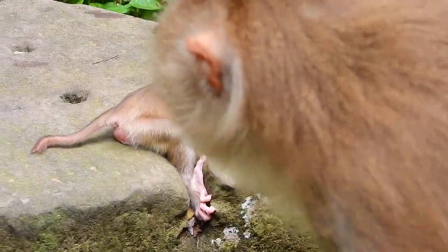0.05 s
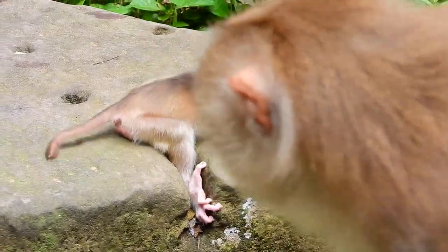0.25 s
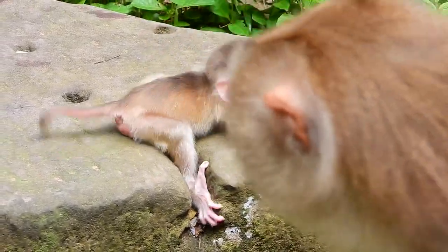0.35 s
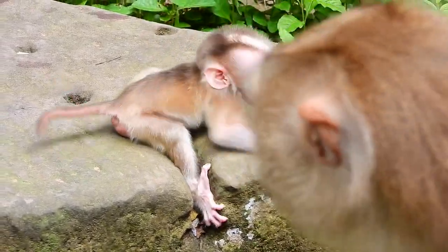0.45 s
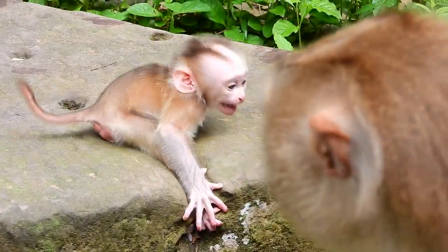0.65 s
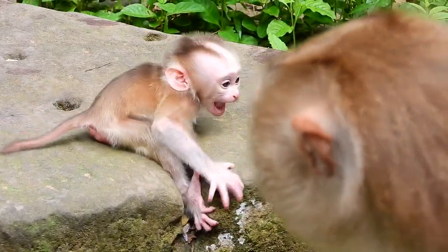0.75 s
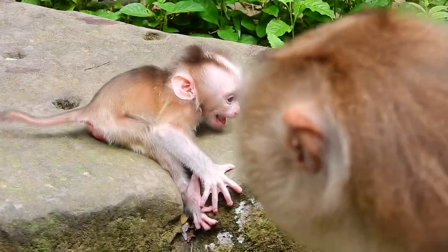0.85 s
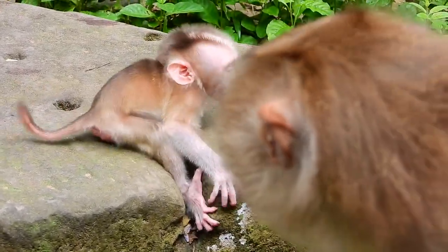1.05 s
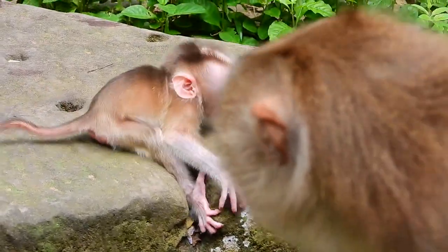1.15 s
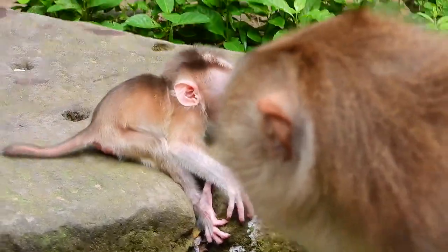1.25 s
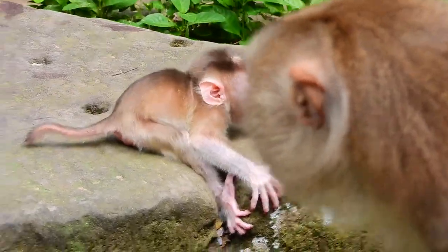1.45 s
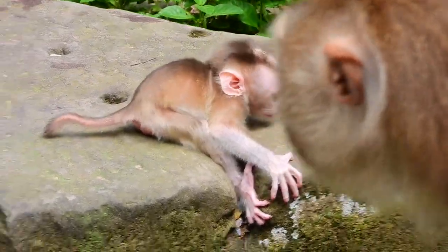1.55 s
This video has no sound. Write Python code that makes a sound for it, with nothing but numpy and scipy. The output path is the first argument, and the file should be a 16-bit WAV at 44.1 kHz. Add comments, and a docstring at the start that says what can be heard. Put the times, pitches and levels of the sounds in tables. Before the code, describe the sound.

Outdoors and near the microphone, an infant monkey squeals four times, first very briefly, then longer and rougher, each sliding downward. Soft scuffs, two small dry clicks and a light echo surround the cries over quiet background hiss.

```python
"""Baby monkey cries on stone

Four short shrill cries outdoors, near the microphone: jittering harmonics and pulsed noise through
four resonances, the mouth first and the upper ones after, with a changing rasp and thin whistles.
Scuffs and low thuds in noise, two faint sine chirps and two damped clicks lie around them, over
filtered-noise hush. Noise-built reflections and a light echo follow all but the clicks and hush."""
import sys
import numpy as np
from scipy import signal
from scipy.fft import rfft, irfft, next_fast_len
from scipy.io import wavfile
from scipy.ndimage import uniform_filter1d, map_coordinates

SR = 44100
rng = np.random.default_rng(int(sys.argv[2]) if len(sys.argv) > 2 else 0)


def digitize_waveform(pressure):
    """Quantize a signal to 16-bit integers and store it at the path in sys.argv[1].

    Rows of a 2-D input are taken as channels; values are limited to [-1, 1].
    """
    field = np.atleast_2d(pressure).T
    bounded = np.clip(field, -1, 1)
    quanta = np.round(bounded * 32767).astype(np.int16)
    wavfile.write(sys.argv[1], SR, quanta)


N = 70560
T = np.arange(N) / SR  # s

# Voice path, one list a cry: t/s, pitch/Hz, roughness/0-1, mouth resonance f/Hz, throat resonance f/Hz
CRY_VOICE = [
    [(.2165, 1211, 0.13, 2470, 1436), (.226, 956, 0.48, 2590, 1470), (.24, 949, 0.74, 2470, 1380),
     (.252, 683.4, 0.83, 2250, 1350), (.264, 606, 0.06, 2200, 1200), (.288, 623, 0.66, 2200, 1260),
     (.32, 529, 0.1, 2030, 1060)],
    [(.4615, 900, 0.6, 2650, 1360), (.476, 944, 0.71, 2820, 1330), (.495, 798, 0.77, 3010, 1220),
     (.515, 691.6, 0.83, 2690, 710), (.545, 806, 0.97, 2750, 1510), (.565, 863, 0.9, 2900, 1450),
     (.59, 729.4, 0.81, 2690, 935), (.635, 507, 0, 2630, 576)],
    [(.765, 900, 0.65, 1900, 1530), (.79, 853.6, 0.5, 2800, 1270), (.81, 677, 0.71, 3000, 1157),
     (.83, 740, 0.62, 3000, 1410), (.85, 802.3, 0.13, 2850, 1600), (.868, 776.7, 0.37, 2770, 1500),
     (.884, 588.3, 0.06, 2620, 1120), (.905, 569, 0.38, 2520, 1070), (.94, 501, 0.9, 2700, 960)],
    [(1.096, 1098, 0.54, 2250, 1100), (1.104, 914.8, 0.25, 2320, 930), (1.122, 925.7, 0.1, 2280, 900),
     (1.134, 814, 0.07, 2220, 1340), (1.145, 822, 0.11, 2320, 1430), (1.163, 948, 0.09, 2330, 1020),
     (1.18, 769.7, 0.9, 2760, 1510), (1.203, 675, 0.69, 2930, 1280), (1.228, 661.6, 0.72, 2930, 1330),
     (1.255, 604, 1, 2930, 1200)],
]
# Resonance levels before trim, one list a cry: t/s, mouth/dB, middle/dB, top/dB, throat/dB
CRY_LEVELS = [
    [(0.22, -41, -53, -52, -50), (0.23, -32, -55, -35.5, -55), (0.236, -35.5, -37.5, -37.5, -51.5),
     (0.256, -49, -38, -39, -41.5), (0.278, -73, -52, -51.5, -49), (0.31, -82, -61, -56.5, -59)],
    [(0.463, -35.5, -64, -44, -54), (0.475, -34, -52, -45, -65), (0.483, -39.5, -44.5, -28.5, -52.5),
     (0.507, -41.5, -35, -41, -49), (0.541, -42.5, -38.5, -48.5, -47.5), (0.563, -55.5, -30, -39, -53.5),
     (0.603, -50.5, -44.5, -53.5, -55), (0.63, -72, -52, -64, -81)],
    [(0.769, -47.5, -76, -60.5, -57), (0.783, -44.5, -53.5, -47.5, -60), (0.799, -41, -42, -38, -55),
     (0.811, -42, -42, -45.5, -45.5), (0.841, -48, -38.5, -43.5, -48.5), (0.853, -47, -39, -41, -63),
     (0.863, -45.5, -37, -37.5, -45.5), (0.871, -54.5, -39, -40, -54), (0.897, -46.5, -36.5, -45.5, -48.5),
     (0.911, -58.5, -40.5, -55, -58), (0.935, -72, -51, -61, -67.5)],
    [(1.1, -39, -61, -56, -64), (1.114, -35.5, -49.5, -40.5, -59), (1.126, -39, -43, -38.5, -52.5),
     (1.138, -34, -63, -34.5, -47), (1.154, -41, -43.5, -40.5, -53), (1.166, -43.5, -42, -32, -56.5),
     (1.184, -45, -37.5, -42.5, -48), (1.218, -43, -46, -47.5, -49.5), (1.226, -40, -42.5, -46, -51.5),
     (1.242, -52, -48.5, -60, -76), (1.25, -59, -48, -58.5, -77)],
]
# Gliding mouth resonance: f over centre/ratio, gain/dB
MOUTH_SHAPE = [(.4, -45), (.66, -14), (.78, -1), (1, 4), (1.21, 0), (1.36, -15.5), (1.6, -36), (2.5, -83)]
# Gliding throat resonance: f over centre/ratio, gain/dB
THROAT_SHAPE = [(.14, -76), (.3, -22), (.42, -3.5), (.55, -17), (.75, -14), (1, 2), (1.17, -5.5),
                (1.38, -2.5), (2.2, -72)]
# Fixed middle resonance: f/Hz, gain/dB
MIDDLE_SHAPE = [(2200, -64), (3400, -7), (3900, -1), (4800, 2.5), (5600, 2), (6300, -7), (7200, -4.5),
                (10000, -65)]
# Fixed top resonances: f/Hz, gain/dB
TOP_SHAPE = [(4500, -50), (6300, -10), (7200, 0), (7900, -3), (8600, -1.5), (9600, -10), (11000, -26),
             (13000, -35), (15500, -38)]
# Thin whistles of the folds, one list a whistle: t/s, pitch/Hz, level/dB
WHISTLE_PATHS = [
    [(.2165, 2550, -3), (.221, 2340, -28.5), (.232, 2370, -44)],
    [(.462, 2750, -35), (.474, 2895, -39.5), (.486, 2800, -56)],
    [(.228, 7800, -36), (.237, 7410, -36.5), (.25, 7400, -43), (.264, 7050, -42)],
    [(.478, 7600, -61), (.492, 7250, -52), (.512, 7500, -32), (.535, 7000, -54)],
    [(.802, 3490, -54), (.812, 3426, -38.5), (.829, 3680, -39), (.855, 3920, -46)],
    [(.866, 5800, -39), (.878, 5370, -57), (.898, 5180, -53), (.922, 5340, -61)],
    [(1.108, 5550, -46), (1.122, 5540, -43.5), (1.137, 5350, -58), (1.166, 5650, -42)],
    [(1.166, 2834, -45), (1.188, 3300, -42), (1.204, 3440, -44), (1.225, 3316, -46.5), (1.24, 2930, -51)],
]
# Scuffs and low thuds in noise, one of them under the end of the third cry:
# t/s, level/dB, centre f/Hz, t60/s
SCUFF_EVENTS = [(0.058, -56.5, 533, 0.28), (0.186, -56, 447, 0.16), (0.318, -49.5, 3200, 0.082),
                (0.365, -51.5, 724, 0.068), (0.379, -50, 3240, 0.3), (0.922, -65, 243, 0.13),
                (1.424, -51.5, 1130, 0.12), (1.431, -58.5, 426, 0.14), (1.48, -54, 4400, 0.37),
                (1.542, -52, 1200, 0.031)]
# Chirps: t/s, length/s, level/dB, start f/Hz, end f/Hz
CHIRP_EVENTS = [(0.029, 0.0085, -44.5, 2335, 1910), (0.662, 0.052, -63, 383, 365)]
# Dry clicks: t/s, ring level/dB, ring f/Hz, snap over ring/dB
CLICK_EVENTS = [(0.3966, -31.5, 3350, -11), (0.4062, -29.5, 4580, -5)]
# Echo decay: f/Hz, t60/s
ECHO_T60 = [(300, 0.3), (1500, 0.95), (4500, 0.43), (8000, 0.53), (14000, 0.64)]
# Echo colour: f/Hz, gain/dB
ECHO_COLOUR = [(200, -6), (1200, -31), (2500, -4), (4500, 9), (8000, -2.5), (14000, -7)]
# Hush spectrum: f/Hz, relative level/dB
HUSH_SPECTRUM = [(25, -3), (60, -18.5), (110, -3.5), (190, -0.5), (300, -1), (450, 3), (730, 2.5),
                 (1200, 1.5), (3300, -2.5), (4000, -6.5), (4850, 2), (5700, -6), (7200, -4.5), (11700, -18),
                 (13800, -28), (15800, -57)]
# Hush level before panning: t/s, level/dB
HUSH_LEVEL = [(0, -61.5), (.1, -59), (.16, -61.5), (.35, -57), (.7, -67.5), (1.05, -68), (1.35, -65),
              (1.6, -61.5)]

# resonance trims; pan is left minus right; noise width is side over mid before filtering
MOUTH_DB, MIDDLE_DB, TOP_DB, THROAT_DB = 0, -2, -6, -0.5
MOUTH_PAN_DB, MIDDLE_PAN_DB, TOP_PAN_DB, THROAT_PAN_DB = 2.2, -5, -8.5, -3.6
MOUTH_WIDTH, MIDDLE_WIDTH, TOP_WIDTH, THROAT_WIDTH = 0.14, 0.16, 0.95, 0.14
MIDDLE_HISS, TOP_HISS = .3, .15  # noise power share left when the voice is smooth
JITTER, JITTER_ROUGH, JITTER_KNOTS_PER_S = .005, .025, 500  # pitch scatter/ratio; added at full roughness
UNEVEN_DB_AT_H10, UNEVEN_KNOTS_PER_S = 5, 30  # swell of each harmonic, given for the tenth
SHIMMER_DB, SHIMMER_KNOTS_PER_S, PUFF_DEPTH = 0.96, 330, 0.55
CRY_EDGE_S = .0025
VOICE_LOW_CUT_HZ = 352  # high-pass: cries and whistles are thin below this
WHISTLE_JITTER, WHISTLE_KNOTS_PER_S, WHISTLE_EDGE_S, WHISTLE_PAN_DB = 0.01236, 240, 0.0061, -1.5
SCUFF_RISE_SHARE, SCUFF_WIDTH_OCT = 0.05, 0.96  # rise time over t60; half width
CLICK_T60_S, SNAP_T60_S, SNAP_LOW_HZ, SNAP_HIGH_HZ = 0.0099, 0.0066, 3520, 8200
NEAR_DB, NEAR_SIDE_DB, NEAR_T60_S = -6, -8, .04
ECHO_DB = -13.5  # before ECHO_COLOUR
HUSH_SIDE_DB, HUSH_PAN_DB = -6, -2  # side over mid; left minus right
CUT_HZ = 15850


def larynx(pitch_hz, rough, count=20):
    """Uneven harmonics of the jittering folds, and two noises that puff once a cycle."""
    scatter = (JITTER + JITTER_ROUGH * rough) * wobble(JITTER_KNOTS_PER_S)
    hz = pitch_hz * (1 + scatter)
    phase = 2 * np.pi * np.cumsum(hz) / SR
    tone = 0
    for k in range(1, count + 1):
        swell = amp(UNEVEN_DB_AT_H10 * np.sqrt(2 * k / count) * wobble(UNEVEN_KNOTS_PER_S))
        harmonic = np.cos(k * phase + 2 * np.pi * rng.random())
        tone = tone + swell * harmonic * (k * hz < CUT_HZ)
    rasp = rng.standard_normal((2, N)) * (1 + PUFF_DEPTH * np.cos(phase))
    # scale the tone to the power density of the noise
    return tone * 2 * np.sqrt(pitch_hz / SR), unit(rasp)


def cries():
    """Voice through four resonances; mouth and throat glide as the mouth moves."""
    out = np.zeros((2, N))
    for voice, levels in zip(CRY_VOICE, CRY_LEVELS):
        pitch_hz, rough, mouth_hz, throat_hz = curves(voice)
        tone, (rasp, scatter) = larynx(pitch_hz, rough)
        gate = edges(voice, CRY_EDGE_S) * amp(SHIMMER_DB * wobble(SHIMMER_KNOTS_PER_S))
        tract = [
            (lambda x: gliding(x, MOUTH_SHAPE, mouth_hz), MOUTH_DB, MOUTH_PAN_DB, MOUTH_WIDTH, 0),
            (lambda x: shaped(x, MIDDLE_SHAPE), MIDDLE_DB, MIDDLE_PAN_DB, MIDDLE_WIDTH, MIDDLE_HISS),
            (lambda x: shaped(x, TOP_SHAPE), TOP_DB, TOP_PAN_DB, TOP_WIDTH, TOP_HISS),
            (lambda x: gliding(x, THROAT_SHAPE, throat_hz), THROAT_DB, THROAT_PAN_DB, THROAT_WIDTH, 0)]
        for (resonance, trim_db, pan_db, width, hiss), level_db in zip(tract, curves(levels)):
            noise_share = np.clip(rough + hiss * (1 - rough), 0, 1)
            noise = np.array([rasp + width * scatter, rasp - width * scatter])
            source = np.sqrt(1 - noise_share) * tone + np.sqrt(noise_share) * noise
            band = steady(resonance(source)) * gate * amp(level_db + trim_db)
            out += pan(band, pan_db)
    return out


def whistles():
    """Narrow wavering sines of the folds that ride on the cries."""
    out = np.zeros(N)
    for rows in WHISTLE_PATHS:
        pitch_hz, level_db = curves(rows)
        hz = pitch_hz * (1 + WHISTLE_JITTER * wobble(WHISTLE_KNOTS_PER_S))
        level = amp(level_db + SHIMMER_DB * wobble(SHIMMER_KNOTS_PER_S))
        out += edges(rows, WHISTLE_EDGE_S) * level * sine(hz)
    return pan(out, WHISTLE_PAN_DB)


def scuffs():
    """Scuffs and low thuds: soft, broad bursts of noise with exponential decay."""
    out = np.zeros(N)
    for start_s, level_db, centre_hz, t60_s in SCUFF_EVENTS:
        def band(hz):
            octaves = np.log2((hz + 1) / centre_hz)
            return 1 / (1 + (octaves / SCUFF_WIDTH_OCT) ** 6)
        t = np.maximum(T - start_s, 0)
        burst = unit(filtered(rng.standard_normal(N), band))
        rise = np.minimum(t / (SCUFF_RISE_SHARE * t60_s), 1)
        out += burst * rise * amp(level_db - 60 * t / t60_s)
    return out


def chirps():
    """Short falling sines under a half-sine envelope."""
    out = np.zeros(N)
    for start_s, length_s, level_db, start_hz, end_hz in CHIRP_EVENTS:
        u = np.clip((T - start_s) / length_s, 0, 1)
        out += amp(level_db) * np.sin(np.pi * u) * sine(start_hz + (end_hz - start_hz) * u)
    return out


def clicks():
    """Each click is a bright noise snap and one quickly damped ring."""
    def bright(hz):
        high_pass = hz ** 3 / (hz ** 3 + SNAP_LOW_HZ ** 3)
        return high_pass / (1 + (hz / SNAP_HIGH_HZ) ** 4)
    out = np.zeros(N)
    for start_s, ring_db, ring_hz, snap_db in CLICK_EVENTS:
        t = np.maximum(T - start_s, 0)
        snap = unit(filtered(rng.standard_normal(N), bright)) * amp(snap_db - 60 * t / SNAP_T60_S)
        ring = np.sin(2 * np.pi * ring_hz * t) * amp(-60 * t / CLICK_T60_S)
        onset = np.minimum(t * ring_hz, 1)  # one ring cycle
        out += onset * amp(ring_db) * (ring + snap)
    return out


def surroundings(x):
    """Quick reflections off the stone widen the sound; a faint longer echo follows, both decaying noise."""
    hz, t, z = signal.stft(rng.standard_normal((2, SR // 2)), SR, nperseg=256)
    decay = amp(-60 * t / along(ECHO_T60, hz)[:, None])
    tail = signal.istft(z * decay, SR, nperseg=256)[1]
    near = rng.standard_normal(tail.shape) * amp(-60 * T[:tail.shape[1]] / NEAR_T60_S)

    def through(response):
        unit_energy = response / np.linalg.norm(response, axis=1, keepdims=True)
        return signal.fftconvolve(x.mean(0)[None], unit_energy, axes=1)[:, :N]

    mid, side = through(near) * amp([[NEAR_DB], [NEAR_SIDE_DB]])
    echo = amp(ECHO_DB) * shaped(through(tail), ECHO_COLOUR)
    return np.array([mid + side, mid - side]) + echo


def hush():
    """Outdoor background: shaped noise of slowly varying level, mostly alike in both channels."""
    mid, side = unit(shaped(rng.standard_normal((2, N)), HUSH_SPECTRUM))
    side = side * amp(HUSH_SIDE_DB)
    return pan(np.array([mid + side, mid - side]), HUSH_PAN_DB) * amp(curves(HUSH_LEVEL)[0])


def gliding(x, shape, centre_hz, size=256):
    """x through a resonance whose centre moves, frame by frame."""
    overlap = size - size // 4
    hz, t, z = signal.stft(x, SR, nperseg=size, noverlap=overlap)
    ratio, db = np.transpose(shape)
    log_ratio = np.log((hz[:, None] + 1) / np.interp(t, T, centre_hz))
    gain = amp(np.interp(log_ratio, np.log(ratio), db))
    return signal.istft(z * gain, SR, nperseg=size, noverlap=overlap)[1][..., :N]


def filtered(x, response):
    """x times a response of frequency, in the spectrum."""
    m = next_fast_len(N + 8192)
    return irfft(rfft(x, m) * response(np.fft.rfftfreq(m, 1 / SR)), m)[..., :N]


def shaped(x, points):
    """x through a fixed (Hz, dB) curve."""
    return filtered(x, lambda hz: amp(along(points, hz)))


def steady(x, size=300):
    """Hold the short-term rms of a pair's mean near 1; size in samples."""
    return x / np.sqrt(np.abs(uniform_filter1d(x.mean(0) ** 2, size)) + 1e-12)


def edges(rows, edge_s):
    """Linear fade in and out at the ends of a path."""
    return np.clip(np.minimum(T - rows[0][0], rows[-1][0] - T) / edge_s, 0, 1)


def sine(hz):
    """Sine of a moving frequency, by summed phase."""
    return np.sin(2 * np.pi * np.cumsum(hz) / SR)


def wobble(knots_per_s):
    """A smooth random curve through normal-distributed knots."""
    return map_coordinates(rng.standard_normal(8192), [T * knots_per_s], mode="wrap")


def curves(rows):
    """One value per sample for each column after the time."""
    s, *cols = np.transpose(rows)
    return [np.interp(T, s, c) for c in cols]


def along(points, hz):
    """Read (Hz, value) points on a log frequency axis."""
    f, v = np.transpose(points)
    return np.interp(np.log(hz + 1), np.log(f + 1), v)


def pan(x, db):
    """Place a sound, left minus right in dB."""
    return x * amp(np.array([[db], [-db]]) / 2)


def unit(x):
    """Scale to rms 1."""
    return x / np.sqrt(np.mean(x ** 2) + 1e-20)


def amp(db):
    """Decibels to gain."""
    return 10 ** (np.asarray(db) / 20)


def scene():
    """Cries and small sounds in their surroundings, with dry clicks, over the hush."""
    high_pass = lambda hz: hz ** 4 / (hz ** 4 + VOICE_LOW_CUT_HZ ** 4)
    voice = filtered(cries() + whistles(), high_pass)
    direct = voice + scuffs() + chirps()
    return direct + surroundings(direct) + clicks() + hush()


def record(dry):
    """The recorder keeps nothing above its band limit."""
    return filtered(dry, lambda hz: hz < CUT_HZ)


dry = scene()
out = record(dry)
digitize_waveform(out)
```